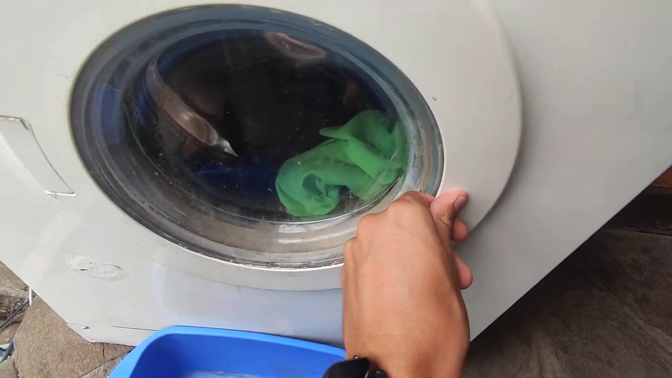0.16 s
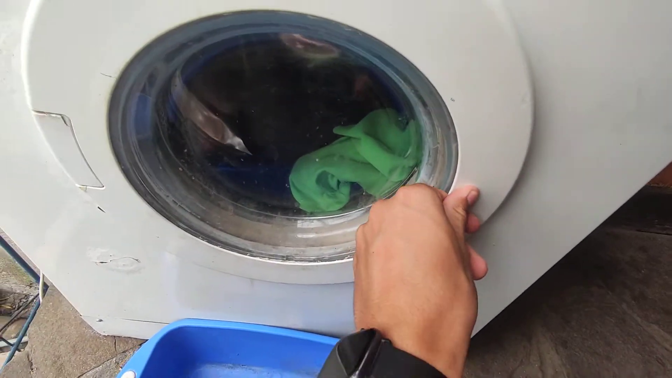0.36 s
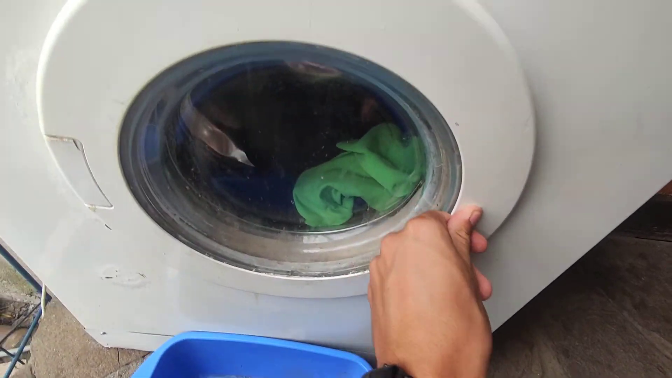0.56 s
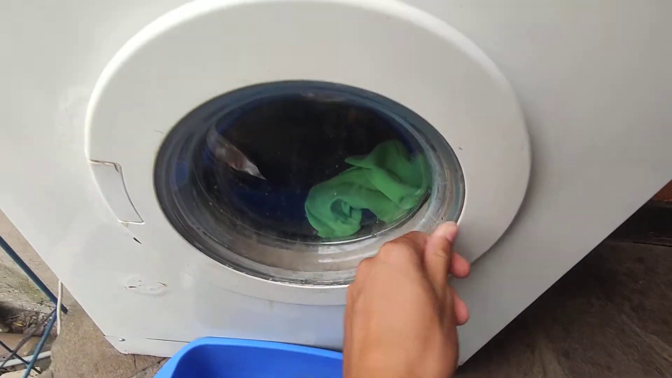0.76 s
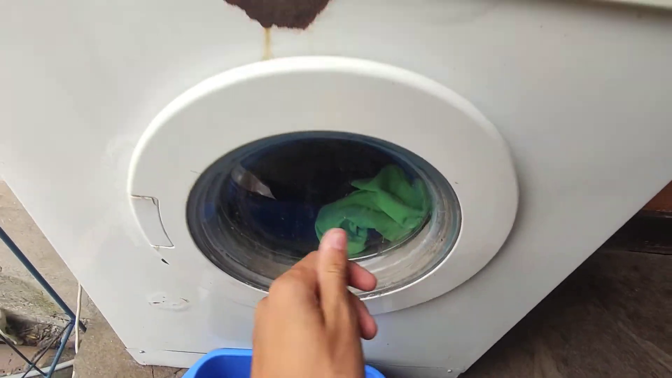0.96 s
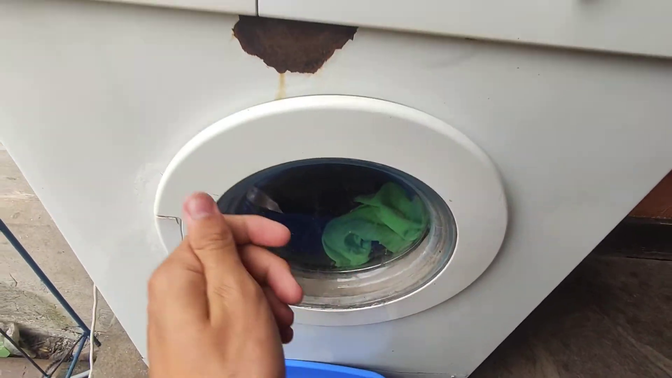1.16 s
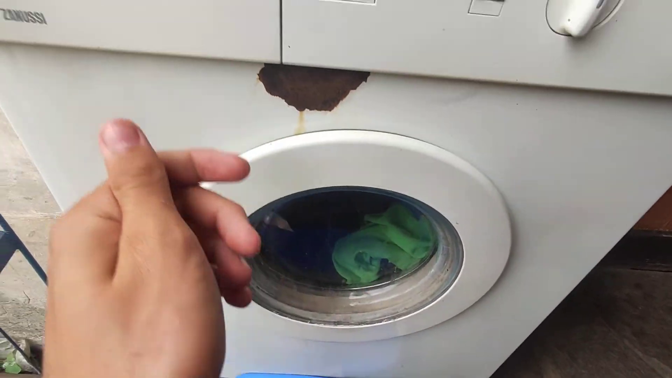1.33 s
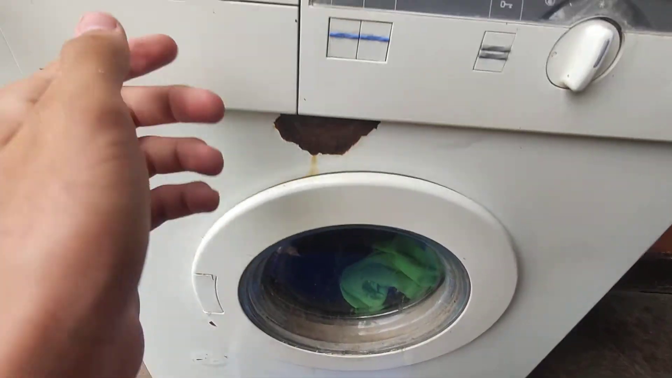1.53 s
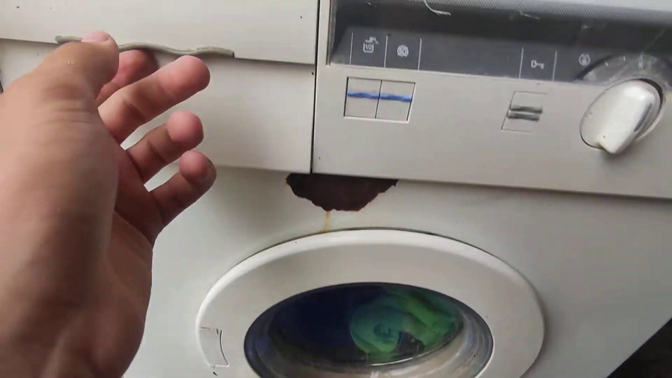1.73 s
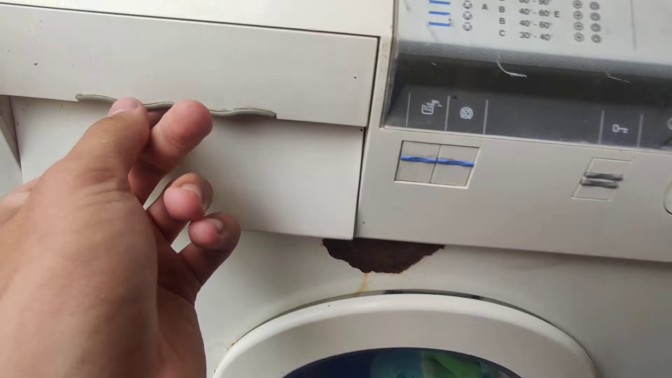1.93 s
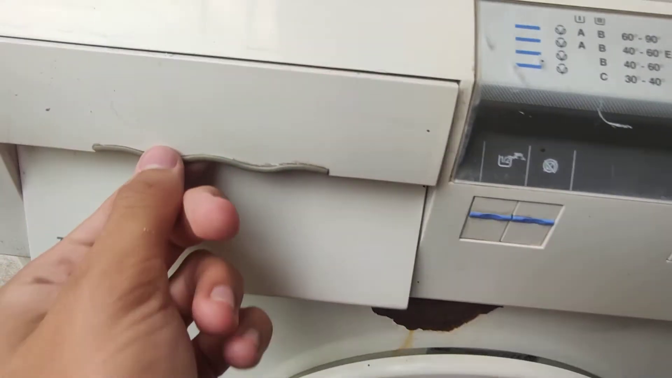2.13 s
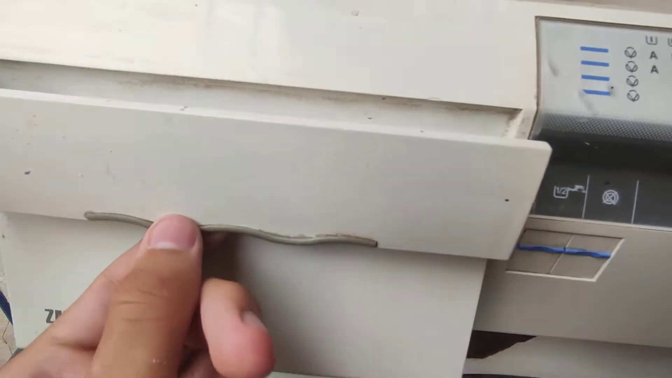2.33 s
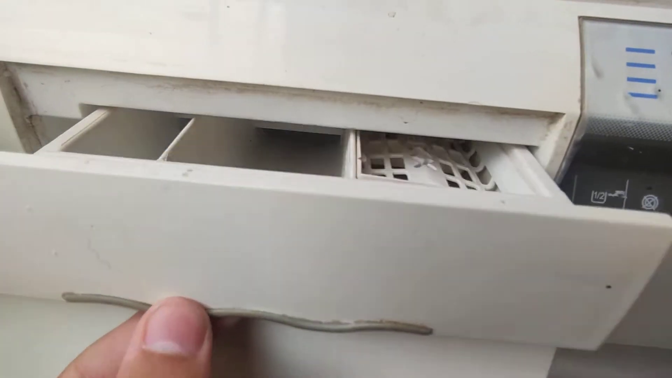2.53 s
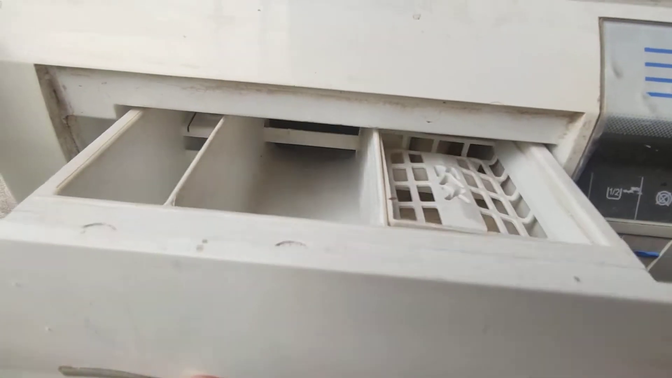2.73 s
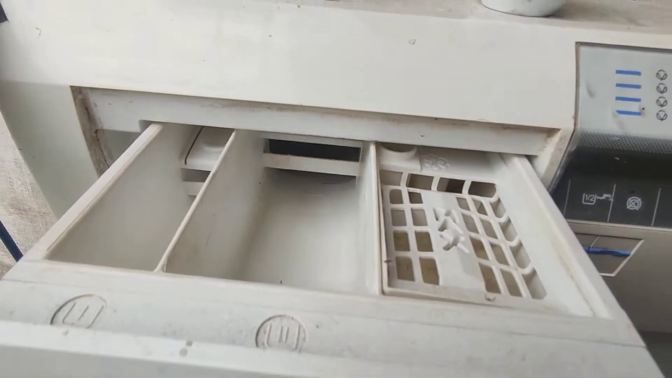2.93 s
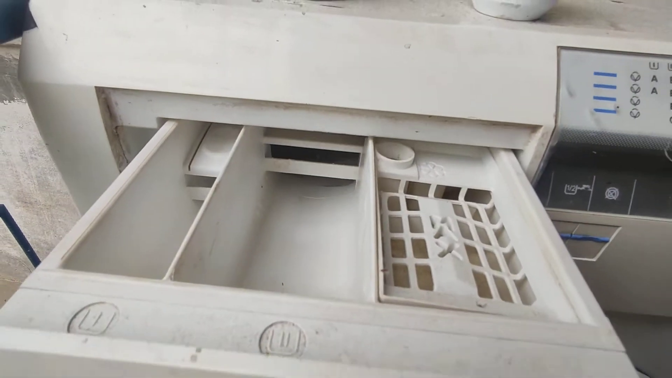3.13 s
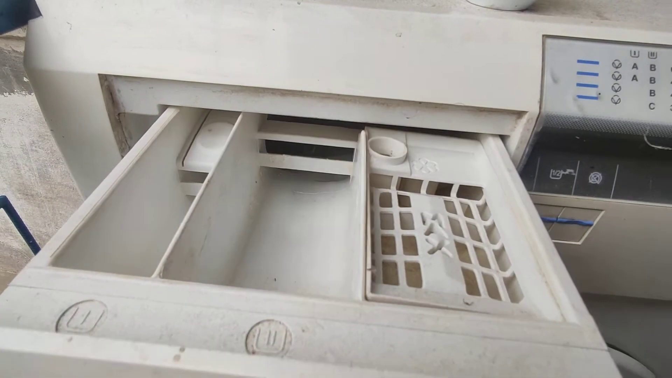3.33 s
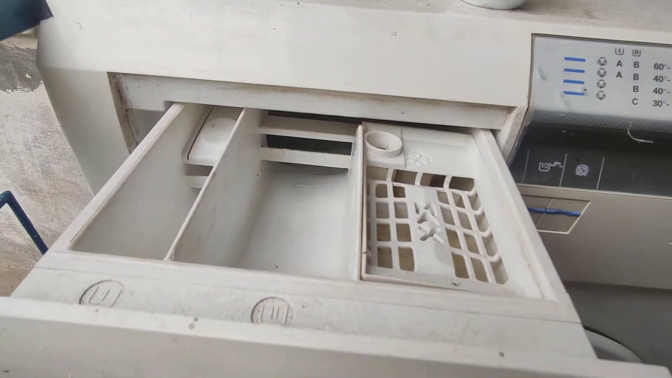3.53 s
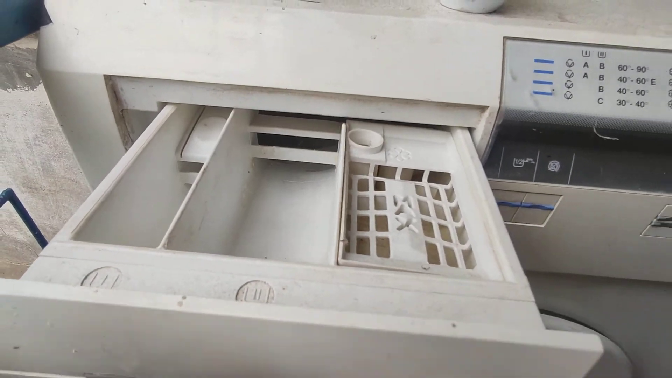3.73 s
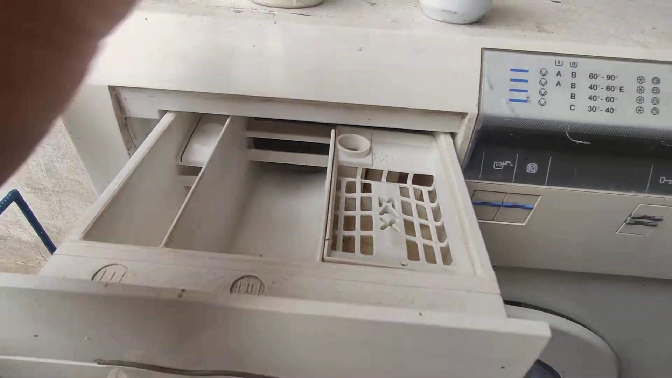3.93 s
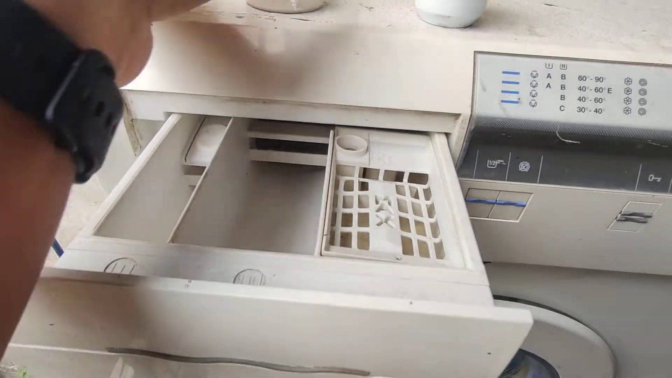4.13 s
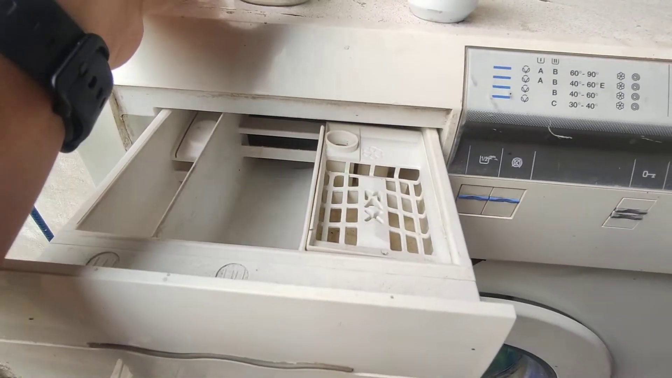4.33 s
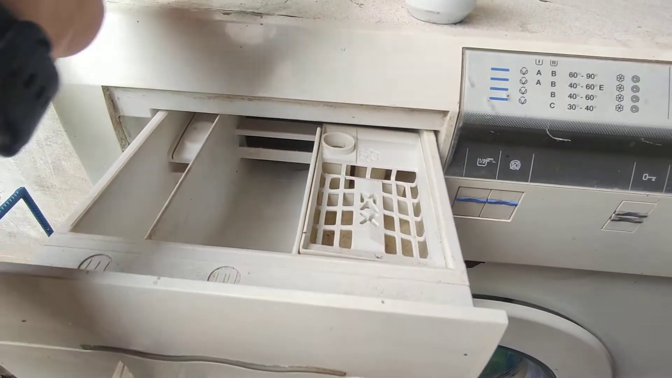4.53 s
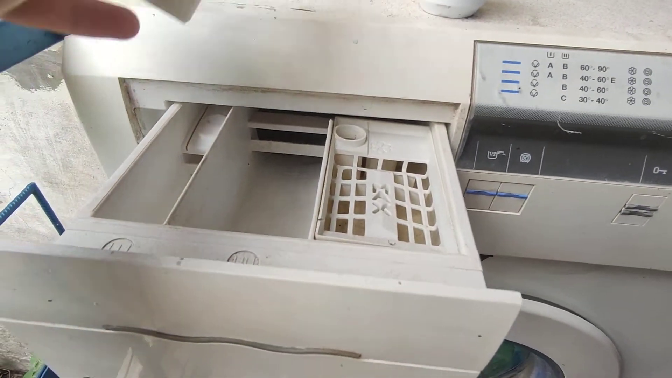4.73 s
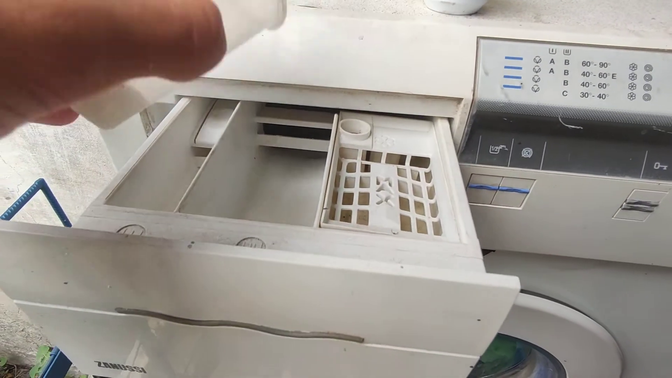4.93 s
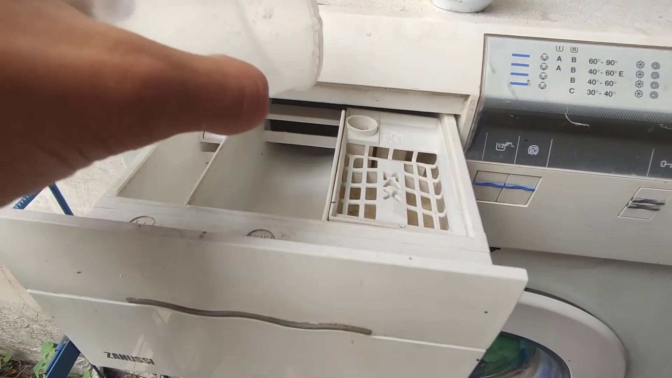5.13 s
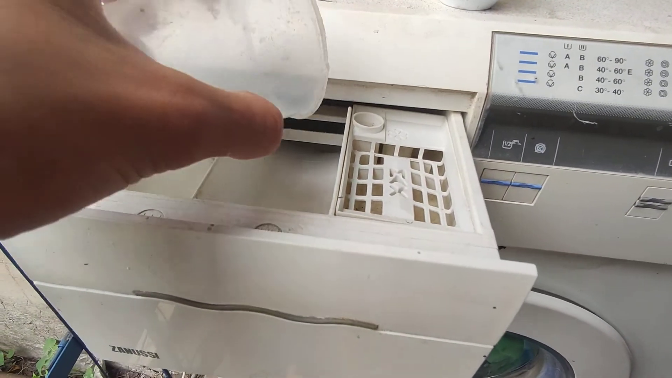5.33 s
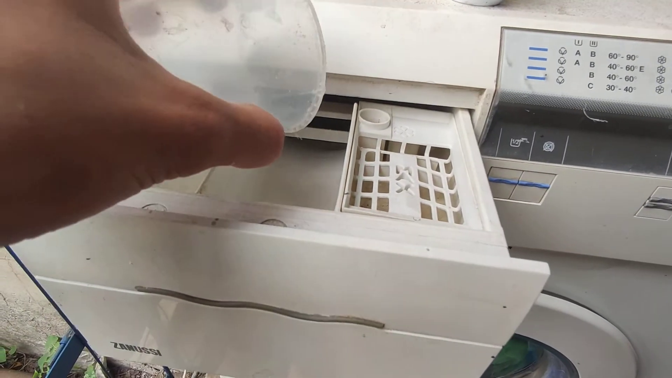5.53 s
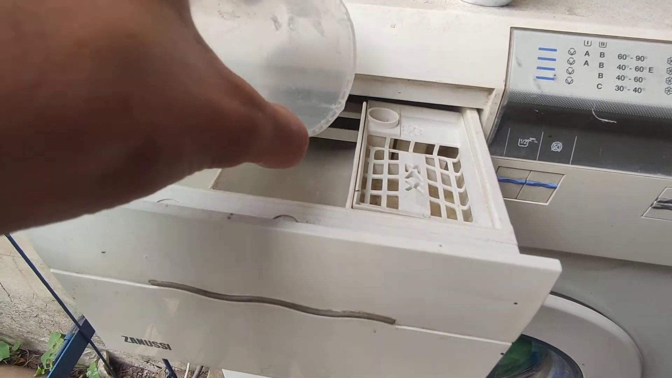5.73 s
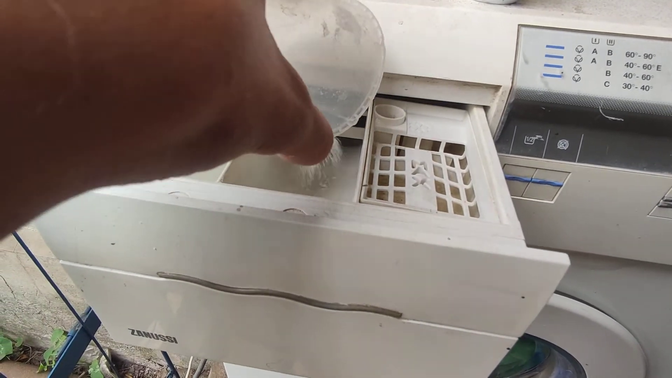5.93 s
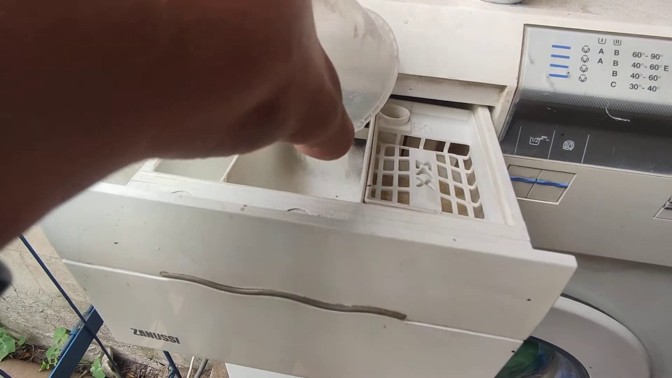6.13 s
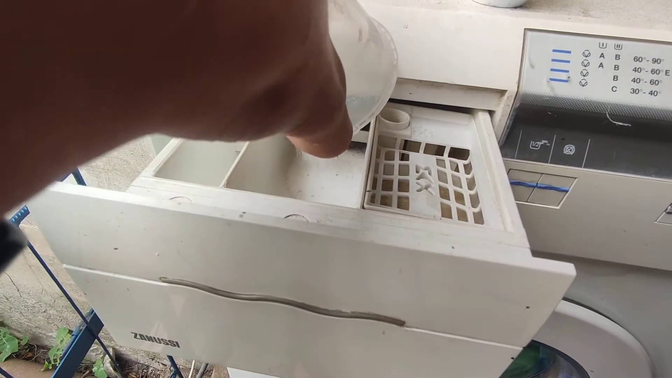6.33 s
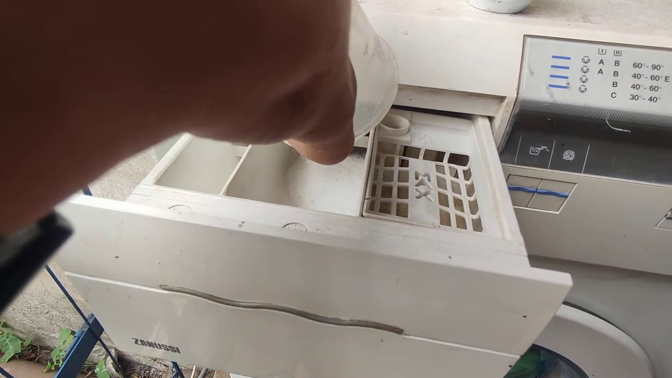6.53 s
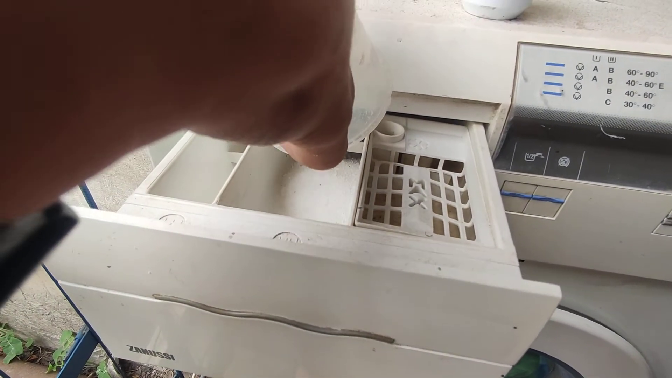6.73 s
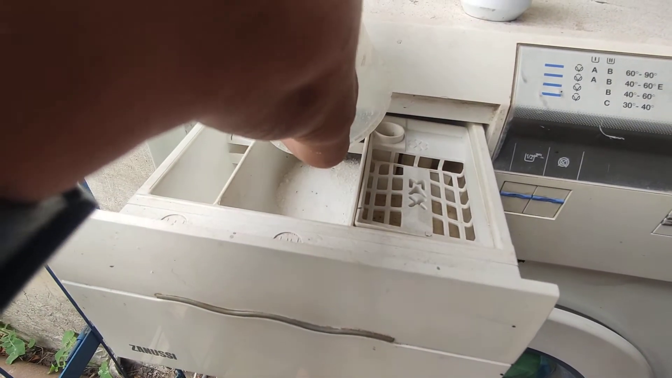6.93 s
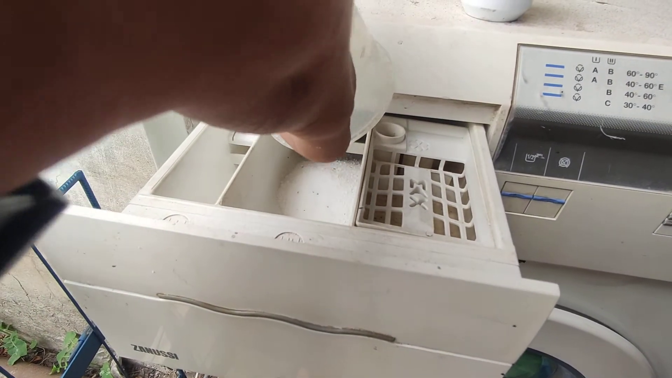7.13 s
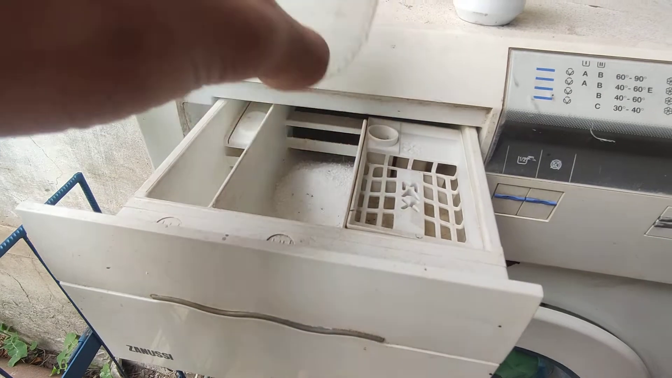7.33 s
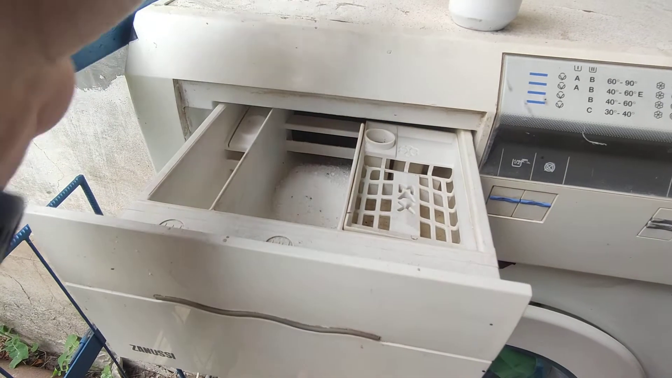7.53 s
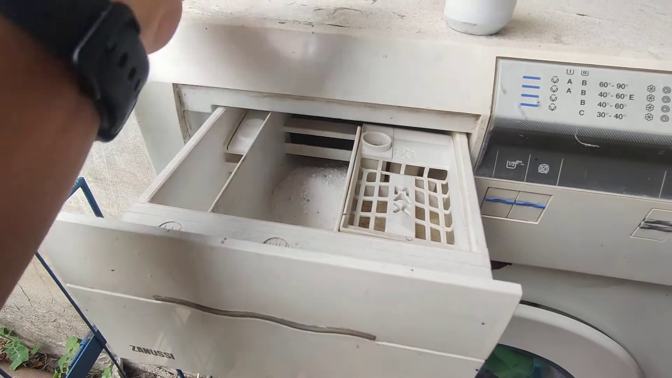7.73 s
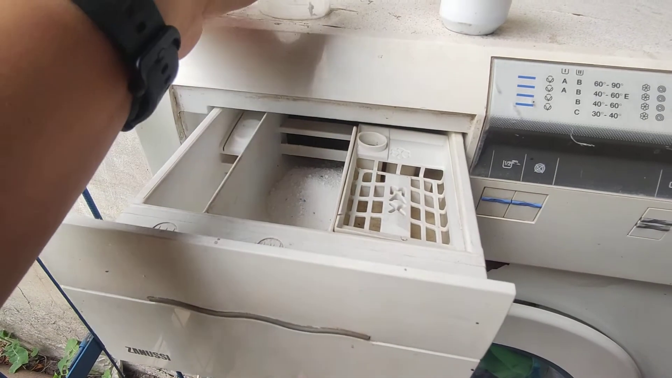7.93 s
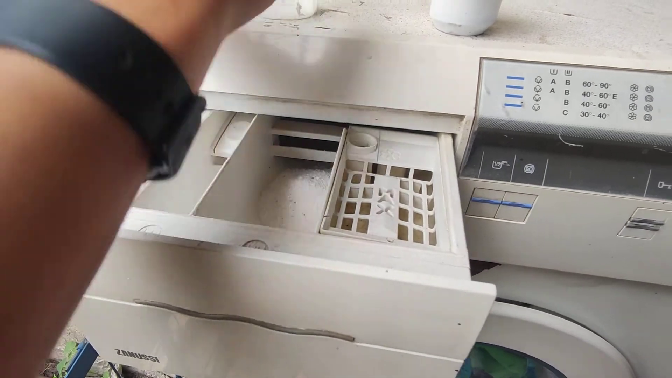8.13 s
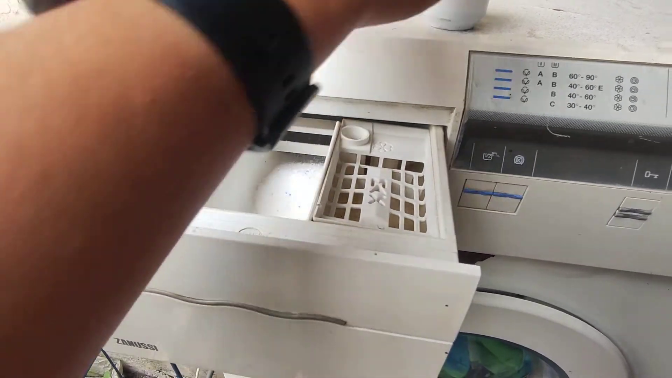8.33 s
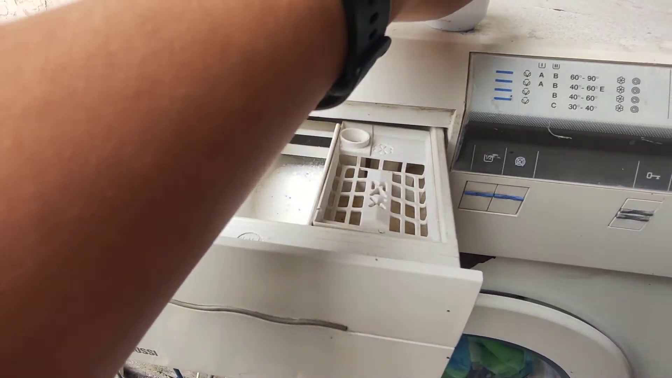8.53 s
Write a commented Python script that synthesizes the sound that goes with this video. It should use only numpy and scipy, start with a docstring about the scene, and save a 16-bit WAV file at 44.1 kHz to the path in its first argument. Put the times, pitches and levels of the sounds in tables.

```python
"""A front-loading washing machine on a sheltered porch, heard from arm's length.
Its door thumps against the rubber seal and latches. Fingers rub the plastic detergent drawer, which
judders out along its rails, hits its stop and drops. Powder hisses into the tray from a plastic cup,
which is then set down on the hollow lid. Each knock makes the panels ring and the porch echo.
Hand and sleeve brush the machine now and then; a low hum and far traffic lie underneath."""
import sys
import numpy as np
from scipy import signal
from scipy.io import wavfile

SR = 44100
rng = np.random.default_rng(int(sys.argv[2]) if len(sys.argv) > 2 else 0)


def bounce(signal):
    """Save signal as a 16-bit WAV file at the path given by the first command-line argument."""
    frames = np.transpose(np.atleast_2d(signal))
    limited = np.clip(frames, -1, 1)
    pcm = np.round(limited * 32767).astype(np.int16)
    wavfile.write(sys.argv[1], SR, pcm)


N = 382347
TIME = np.arange(N) / SR
RING_TIME = TIME[:SR // 2]
BAND_EDGES = np.geomspace(35, 16500, 24)
FILTER_BANK = [(np.sqrt(low * high), signal.butter(2, [low, high], "band", fs=SR, output="sos"))
               for low, high in zip(BAND_EDGES, BAND_EDGES[1:])]

# Levels are relative: each layer applies its own gains. A mode is a tone that a part rings with.
# t60 is the time a sound takes to fade by 60 dB.
# how alike left and right are: f/Hz, correlation
LIKENESS = [(60, 1), (130, 0.89), (250, 0.95), (500, 0.45), (1000, 0.011), (4000, .03), (12000, 0.055)]
# fading of the panels' many short modes, and of the porch's echo: f/Hz, t60/s
PANEL_T60 = [(120, 0.15), (400, 0.19), (1200, 0.096), (4000, 0.17), (12000, 0.035)]
PORCH_T60 = [(120, 1), (400, 0.33), (1200, 0.29), (4000, 0.32), (12000, 0.2)]
# short echoes from the panels close by: delay/ms, level/dB
PANEL_ECHOES = [(1.3, -8), (2.3, -5), (3.7, -6)]
# tone colour of background air, brushing, sliding and falling powder: f/Hz, level/dB
AIR_COLOUR = [(18, -44), (30, -21.5), (55, -19), (123, 8), (152, -3), (173, -2), (292, -2), (379, -1),
              (420, 3), (606, -9), (787, -10.5), (1440, -19.5), (1590, -17), (3230, -29.5), (15500, -50.5)]
BRUSH_COLOUR = [(200, 22), (400, 22), (900, 22), (1400, 25.5), (2200, 15.5), (3200, 21.5), (4400, 17.5),
                (5500, 0), (8500, 3), (12000, -14), (15500, 0)]
SLIDE_COLOUR = [(59, -32), (100, -11), (192, -6.5), (228, 1.5), (319, 1), (530, -29), (825, -21.5),
                (1090, -29), (1400, -18), (2180, -33), (3250, -25), (5630, -23), (8410, -30), (11100, -36),
                (15500, -44.5)]
POWDER_COLOUR = [(300, -50), (1200, -5), (1800, 0), (2800, -10.5), (4500, -4.5), (8500, -2), (11000, -9.5),
                 (15500, -10)]
# tone colour of knocks from the door, drawer, dropping tray and cup: f/Hz, level/dB
DOOR_COLOUR = [(35, -57.5), (80, -7), (135, -3.5), (400, -5), (657, -21), (889, -15.5), (1230, -27.5),
               (1320, -7.5), (2010, -23.5), (2410, -19.5), (3580, -36.5), (5450, -25), (6410, -41),
               (9510, -23), (15500, -50)]
DRAWER_COLOUR = [(53, -39.5), (130, -17.5), (290, 3), (599, -32.5), (682, -1.5), (902, -7.5), (1140, -2.5),
                 (1300, -3.5), (1580, -2.5), (1800, -3.5), (3010, -18), (4540, -32), (4950, -37.5),
                 (8660, -45.5), (15500, -56)]
DROP_COLOUR = [(53, -36.5), (150, -8), (290, 1), (600, -11), (800, 0.5), (1100, 1), (1350, -11.5),
               (1700, -0.5), (2100, -4.5), (3200, -12), (4500, -22.5), (6000, -28.5), (8700, -26),
               (15500, -33.5)]
CUP_COLOUR = [(59, -54), (100, -4), (210, 8), (347, 3), (541, 4), (697, 3), (936, -33), (1310, 0),
              (1430, -51), (3460, -40), (4190, -9.5), (15500, -16)]
# tones of the hum: f/Hz, level/dB
HUM_TONES = [(60, -9), (119, -15), (290, -6), (430, -4.5)]
# rise and fall of the far traffic: t/s, level/dB
TRAFFIC_LEVEL = [(0.0, -50.5), (0.55, -54.5), (1.11, -52.5), (2.051, -54.5), (2.44, -49), (2.748, -58),
                 (3.137, -57), (5.479, -58.5), (6.62, -57.5), (8.67, -59.5)]
# hand and sleeve stroke the panels: t/s, rise/s, hold/s, rub/dB, hiss/dB
HAND_STROKES = [(0.015, 0.025, 0.004, -55.5, -55.5), (0.515, 0.0076, .005, -46.5, -55.5),
                (0.52, 0.06, 0.093, -52.5, -55.5), (0.8, 0.051, 0.23, -58, -62),
                (1.2, 0.18, 0.0082, -47, -52.5), (1.84, 0.065, 0.038, -52.5, -56),
                (2.091, 0.0009, 0.0026, -48, -51.5), (3.79, 0.086, 0.09, -56.5, -66.5),
                (4.24, .15, 0.0054, -55.5, -58.5), (4.48, 0.017, 0.011, -51.5, -56),
                (5.55, 0.018, 0.0041, -52.5, -57.5), (7.915, 0.02, 0.017, -43.5, -45.5),
                (8.06, 0.0085, 0.012, -55.5, -56.5)]
# pitch ranges of a knock's four parts, thud, knock, clack and tick: low/Hz, high/Hz
KNOCK_ZONES = [(60, 550), (550, 2000), (2000, 6000), (6000, 16000)]
# knocks of the door, handle, drawer, dropping tray and cup:
# t/s, thud/dB, knock/dB, clack/dB, tick/dB, left minus right/dB, ring length factor
DOOR_HITS = [(0.0882, -24, -27, -23.5, -39, -1, 0.22), (0.0915, -65, -60, -61, -31.5, 8, 0.2),
             (0.1215, -30.5, -47, -68, -63, 0, 0.53), (0.2515, -81, -70, -62, -76, 6, 0.5),
             (0.539, -43, -67, -50.5, -89, -1, 0.5), (0.634, -44.5, -73, -78, -64, -4, 0.59)]
HANDLE_HITS = [(1.731, -41, -58, -61, -60, -0.5, 0.8), (1.762, -47.5, -60, -58, -65.5, -4, 0.45),
               (1.8855, -44, -49.5, -64, -56, -3, 1), (2.1425, -62, -48.5, -55, -89, -6, 0.22)]
DRAWER_HITS = [(2.2275, -35, -46, -71, -57, -2, 0.59), (2.2578, -48, -40.5, -41.5, -52, -3, 0.4),
               (2.274, -48, -45, -61, -67, -2, 0.35), (2.287, -60, -39.5, -47, -69, -5, 0.37),
               (2.307, -62, -53, -56, -57, 0, 0.25), (2.334, -40, -52, -47, -66, -4, 0.35),
               (2.3418, -39.5, -42, -44, -54, -1, 0.35), (2.3675, -32.5, -51, -64, -77, -5, 0.58),
               (2.4288, -49, -64, -67, -75, -3, 0.35), (2.543, -40, -43, -49, -72, -6, 0.23),
               (2.553, -34, -43.5, -38.5, -74, -3, 0.2), (2.571, -57, -49, -60, -70, 1, 0.25),
               (2.7095, -67, -38.5, -46, -66, -4, 0.3), (2.774, -34.5, -64, -50, -58, -3, 0.26),
               (2.790, -54, -38.5, -47, -63, -5, 0.19), (3.3278, -16.5, -21, -38, -31, 1, 0.23),
               (3.3315, -34, -49, -27.5, -28, 2, 0.24), (3.342, -46, -50, -32, -47, 0, 0.4),
               (3.4116, -44, -36, -52, -56, -3, 0.3)]
DROP_HITS = [(3.608, -65, -48.5, -62, -62, -0.5, 0.75), (3.619, -43, -47, -58.5, -54, -11, 0.46),
             (3.6341, -26.5, -26, -30, -24, 0, 0.37), (3.6395, -35, -25, -36, -52, -1, 0.26),
             (3.652, -39, -27.5, -42.5, -36.5, 1, 1)]
CUP_HITS = [(4.404, -45.5, -75, -69, -91, 0.82, 0.61), (4.515, -47.5, -63, -69, -76, 0, 0.85),
            (5.7873, -66, -73, -67, -73, -1.2, 0.6), (6.511, -60, -59, -78, -73, 0.011, 0.48),
            (7.9102, -30.5, -36.5, -59.5, -63, 0.26, 0.41), (7.936, -60, -49, -62, -66, 0, 3.3),
            (8.074, -55, -75, -60, -87, 0, 3)]
# modes of the door, the hollow handle and the cup's knocks: f/Hz, level/dB, t60/s
DOOR_MODES = [(112, -6, .28), (130, -1, .3), (245, -2, .33), (301, 1, .33), (361, -2, .35), (430, -5, .3),
              (560, -18, .38), (781, -15, .31), (1040, -13, .15), (1190, -10, .16), (1320, -4, .12),
              (1400, -5, .12), (1480, -10, .16), (1618, -10, .15), (1820, -11, .14), (2316, -10, .1),
              (2476, -12, .17), (3075, -17, .12), (4226, -19, .15), (4500, -19, .15)]
HANDLE_MODES = [(435, -8, .3), (760, 2, .06), (1012, 5.5, .17), (1150, 0, .08)]
CUP_MODES = [(319, -1, .15), (360, 3, .09), (417, -6, .12), (680, 1, .07), (765, -3, .08), (1120, -14, .1),
             (1255, -7, .065), (1420, -7, .05), (1730, -5, .035)]
# the seal takes the door, rebounds and gives as the hand lets go: t/s, f/Hz, level/dB, half length/s
SEAL_THUMPS = [(0.0854, 133, -13.5, 0.0089), (0.165, 115, -29, 0.024), (0.249, 121, -36.5, 0.027),
               (0.545, 149, -37.5, 0.022), (0.638, 131, -30.5, 0.0064), (0.676, 128, -33, 0.0076)]
# fingers rub the drawer front, lightly and then pressing: t/s, rise/s, hold/s, rasp/dB, hiss/dB
FINGER_RUBS = [(1.558, 0.028, 0.026, -46, -41), (1.612, 0.032, 0.036, -38.5, -43.5)]
# resonances of the drawer front and of the tray's thin walls: f/Hz, width/Hz, level/dB
DRAWER_FRONT = [(1750, 120, 6), (2050, 45, 6), (2300, 45, 3), (2600, 40, 4), (2900, 50, 3), (3200, 50, 3),
                (3480, 50, 6), (4390, 130, 4), (4800, 45, 4), (5820, 40, 0), (8050, 40, 0)]
TRAY_WALLS = [(2320, 70, 2), (2890, 65, 3), (3380, 50, 0), (3950, 130, 1), (4380, 70, 0), (4680, 130, 2),
              (5300, 60, 3), (6400, 110, 1)]
# modes of the tray when jerked lengthwise and when dropped: f/Hz, jerked/dB, dropped/dB, t60/s
TRAY_MODES = [(122, -14, -17, .2), (240, -4, -6, .34), (303, -1, -5, .19), (365, -2, -5, .16),
              (465, 2, -2, .06), (690, 0, -6, .05), (830, -6, -10, .15), (1017, -10, 0, .18),
              (1150, 0, -5, .24), (1305, -1, -12, .13), (1600, -8, 0, .17), (2067, -10, -3, .16),
              (2316, -6, -9, .15), (2705, -17, -13, .17), (2900, -10, -12, .15), (3050, -10, -6, .14),
              (3380, -14, -13, .11), (3850, -17, -15, .13), (4460, -14, -10, .07)]
# the tray sticks on its catch, drags off its seat, and rubs before its stop and its drop:
# t/s, rise/s, hold/s, rumble/dB, scrape/dB, hiss/dB
TRAY_DRAGS = [(2.17, .13, 0.056, -45.5, -45.5, -58), (2.34, 0.015, 0.054, -41.5, -75, -82),
              (3.275, 0.051, 0.003, -43, -39.5, -46.5), (3.594, 0.011, 0.025, -65.5, -55, -55.5)]
# speed of the freely sliding drawer, given as a loudness: t/s, level/dB
PULL_SPEED = [(2.39, -67), (2.598, -56.5), (2.662, -60), (2.85, -57.5), (3.09, -60.5), (3.16, -73),
              (3.22, -99)]
# squeaks of the rails: t/s, f/Hz, level/dB, half length/s
RAIL_SQUEAKS = [(2.303, 1600, -24, 0.0021), (2.3103, 1596, -23.5, 0.01), (2.839, 1490, -33.5, 0.005)]
# powder flow, one list each for a first trickle, the main pour and a last shake: t/s, level/dB
POWDER_FLOW = [
    [(5.15, -70), (5.218, -64), (5.226, -64), (5.45, -69), (5.52, -90)],
    [(5.82, -71), (5.91, -59.5), (5.985, -58), (6.02, -51), (6.055, -51), (6.085, -57), (6.25, -58.5),
     (6.498, -67.5), (6.51, -69)],
    [(6.56, -66), (6.624, -55.5), (6.678, -57), (6.778, -84), (6.78, -78)],
]
# lumps of powder tick on the plastic: t/s, level/dB, f/Hz
POWDER_LUMPS = [(5.1102, -56.5, 6600), (5.1375, -53, 6600), (5.2297, -58, 6450), (5.7868, -46, 4820),
                (5.8684, -56, 4130), (6.012, -62, 3900), (6.038, -49.5, 3600), (6.056, -53, 4200),
                (6.843, -62.5, 9450)]
# peaks and dips in the treble of each side: f/Hz, width/Hz, left/dB, right/dB
TREBLE_SHAPE = [(2780, 7800, 1, -1), (4760, 330, -5.5, 3), (4950, 130, -7.5, -7.5),
                (5590, 170, -16.5, -11.5), (6610, 110, 3, 8.5), (6990, 378, -18, -5), (7950, 980, -17, 2.5),
                (8400, 560, -8.5, 7), (11040, 660, -2, -6.5), (12160, 410, 6, 4.5)]

QUICK_FADE_DB_PER_S = 461.5
CUTOFF_HZ = 15800


def amp(db):
    """Turn decibels into a gain."""
    return np.exp(np.log(10) / 20 * np.asarray(db))


def at_hz(points, hz):
    """Read a table at a frequency, on a log-frequency axis."""
    points = np.array(points)
    return np.interp(np.log(hz), np.log(points[:, 0]), points[:, 1])


def gain_curve(rows):
    """Join (time, level) points into a gain that fades out beyond both ends."""
    s, db = np.transpose(rows)
    inside = np.clip(1 + np.minimum(TIME - s[0], s[-1] - TIME) / 0.055, 0, 1)
    return inside * amp(np.interp(TIME, s, db))


def unit(x, count=N):
    """Scale a stereo sound so that its middle has rms 1 over the first count samples."""
    return x / np.sqrt(np.mean(x.mean(0)[:count] ** 2) + 1e-20)


def band(x, low_hz, high_hz, order=2):
    """Keep the sound between two frequencies."""
    sos = signal.butter(order, [low_hz, min(high_hz, .45 * SR)], "band", fs=SR, output="sos")
    return signal.sosfilt(sos, x)


def ring(x, hz, width_hz):
    """A resonance: let through only the sound near one pitch."""
    return signal.lfilter(*signal.iirpeak(hz, hz / width_hz, fs=SR), x)


def drift(per_s):
    """A random curve, about 1 in size, that turns per_s times a second."""
    knots = rng.standard_normal(N // 20)
    return np.interp(TIME * per_s, np.arange(len(knots)), knots)


def pair(two, hz):
    """Mix two unrelated signals into left and right, alike in the bass."""
    alike = at_hz(LIKENESS, hz)
    return np.sqrt(1 + alike) * two[0] + np.sqrt(1 - alike) * two[1] * [[1], [-1]]


def pan(x, left_db):
    """Lean a sound to the left or right."""
    return x * amp([[left_db / 2], [-left_db / 2]])


def add(out, s, sound):
    """Mix a sound in at s seconds."""
    start = round(s * SR)
    out[:, start:start + sound.shape[-1]] += sound[..., :N - start]


def grains(per_s, spread_db):
    """Four streams of tiny random impacts of uneven size."""
    happens = rng.random((2, 2, N)) < per_s / SR
    impacts = happens * rng.standard_normal((2, 2, N))
    return impacts * amp(spread_db * np.minimum(rng.exponential(1, N), 4)) + 1e-18


def coloured(streams, colour):
    """Give noise a tone colour band by band; neighbouring bands take different streams."""
    return sum(amp(at_hz(colour, hz)) * pair(signal.sosfilt(sos, streams[k % 2]), hz)
               for k, (hz, sos) in enumerate(FILTER_BANK))


def bump(s, half_length_s):
    """A bell-shaped gain that peaks at s seconds."""
    return np.exp(-np.minimum(((TIME - s) / half_length_s) ** 2, 20))


def swell(s, rise_s, hold_s, fade_db_per_s):
    """Gain of one movement: it builds up, holds and dies away."""
    rise = np.clip((TIME - s) / max(rise_s, .001), 0, 1)
    fade_db = fade_db_per_s * np.maximum(TIME - s - rise_s - hold_s, 0)
    return rise * amp(-np.minimum(fade_db, 200))


def movements(rows, fade_db_per_s):
    """One gain curve for each level column in a table of rubbing movements."""
    power = sum((amp(levels_db)[:, None] * swell(s, rise_s, hold_s, fade_db_per_s)) ** 2
                for s, rise_s, hold_s, *levels_db in rows)
    return np.sqrt(power)


def read_at(x, times):
    """Read both sides of a sound at shifted times."""
    return np.array([np.interp(times, TIME, side) for side in x])


def panel_echoes(x, waver=.008, per_s=3):
    """Add short echoes from nearby panels; their paths waver as the hand moves."""
    out = x
    for delay_ms, db in PANEL_ECHOES:
        delay_s = delay_ms / 1000 * (1 + waver * drift(per_s))
        out = out + amp(db) * read_at(x, TIME - delay_s)
    return out


def wall_ringing(x, resonances, pitch_share=.02, waver_db=3.5, per_s=14):
    """A plastic wall's resonances shift in pitch and strength as the contact moves over it."""
    out = 0
    for hz, width_hz, db in resonances:
        shifted = TIME + pitch_share / per_s * drift(per_s)
        out = out + amp(db + waver_db * drift(per_s)) * read_at(ring(x, hz, width_hz), shifted)
    return out


def struck(colour, modes, length, modes_db, crack_db, porch_db):
    """One knock: a contact crack, a wash of short panel modes, the porch's echo and a few clear modes."""
    t, wash, tones = RING_TIME, 0, 0
    noise = rng.standard_normal((2, 2, len(t)))
    for k, (hz, sos) in enumerate(FILTER_BANK):
        panel = amp(-60 * t / (length * at_hz(PANEL_T60, hz))) * np.minimum(t / 0.00063, 1)
        porch = amp(porch_db - 60 * t / at_hz(PORCH_T60, hz)) * np.minimum(t / 0.0079, 1)
        force = pair(noise[k % 2], hz) * (panel + porch)
        force[:, 0] += amp(crack_db) * (-1) ** k
        wash = wash + amp(at_hz(colour, hz)) * signal.sosfilt(sos, force)
    for k, (hz, db, t60) in enumerate(modes):
        # short waves reach the two sides out of step
        skew = (-1) ** k * np.arccos(at_hz(LIKENESS, hz)) * np.array([[.5], [-.5]])
        fade = amp(db + rng.normal(0, 1) - 60 * t / t60)
        pitch_hz = hz * (1 + .003 * rng.normal())  # the parts sit differently at each knock
        tones = tones + (-1) ** k * fade * np.sin(2 * np.pi * pitch_hz * t + skew)
    tones = tones * np.minimum(t / 0.00038, 1)
    return unit(wash, count=900) + amp(modes_db) * unit(tones, count=900)


def knocks(hits, colour, modes, length, modes_db, crack_db, porch_db):
    """Where and how hard a part is struck sets its share of thud, knock, clack and tick."""
    out = np.zeros((2, N))
    for s, *levels_db, left_db, ringing in hits:
        sound = struck(colour, modes, length * max(ringing, .2), modes_db, crack_db, porch_db)
        # alternate signs keep neighbouring zones in step where they overlap
        zones = [(-1) ** k * amp(db) * unit(band(sound, *KNOCK_ZONES[k]), count=900)
                 for k, db in enumerate(levels_db)]
        add(out, s, pan(sum(zones), left_db))
    return out


def surroundings(hiss_db, waver_db):
    """A wavering hum, low rumble, far traffic, faint hiss and, later, a deep drone."""
    s, db = np.transpose(TRAFFIC_LEVEL)
    traffic_db = np.interp(TIME, s, db)
    air = coloured(rng.standard_normal((2, 2, N)), AIR_COLOUR)
    hum = sum(amp(db + waver_db * drift(3.7)) * np.sin(2 * np.pi * hz * TIME + 1.35 * drift(5.0))
              for hz, db in HUM_TONES)
    bass = amp(-55.5) * hum + amp(-50) * unit(band(air, 32.0, 150))
    rumble_db = -45.5 + 0.82 * (traffic_db - traffic_db.mean())  # follows most of the traffic's swing
    rumble = amp(rumble_db) * unit(band(air, 121.7, 451.6))
    traffic = amp(6 + traffic_db) * unit(band(air, 520.0, 1700))
    # the drone comes up at 5.5 s, holds, and swells from 8.04 s
    drone_gain = np.clip((TIME - 5.5) / 0.88, 0, 1) * amp(-61.5 + 16.5 * np.maximum(TIME - 8.04, 0))
    phase = 2 * np.pi * 60.0 * TIME + 0.95 * drift(16)
    drone = drone_gain * (np.sin(phase) + amp(3) * np.sin(2 * phase))
    return bass + drone + rumble + traffic + amp(hiss_db) * unit(band(air, 3500, 24000))


def brushing(fibres_per_s):
    """Skin and cloth scuff over the panels in small jerks."""
    scuffs = coloured(grains(fibres_per_s, spread_db=1.5), BRUSH_COLOUR)
    rub = panel_echoes(scuffs * amp(2.0 * drift(190)))
    rub_gain, hiss_gain = movements(HAND_STROKES, fade_db_per_s=190)
    return rub_gain * unit(band(rub, 250, 5000)) + hiss_gain * unit(band(rub, 4500, 16000))


def door(spring_s, spring_db, lead_in_db):
    """The rubber seal takes the door with a soft thump, the latch snaps and its spring pings."""
    out = knocks(DOOR_HITS, DOOR_COLOUR, DOOR_MODES,
                 length=1.0, modes_db=-9.5, crack_db=18.5, porch_db=-18.0)
    for s, hz, db, half_length_s in SEAL_THUMPS:
        out = out + amp(db) * bump(s, half_length_s) * np.sin(2 * np.pi * hz * (s - TIME))
    # a narrow band of noise stands for the spring's cluster of close modes
    spring = unit(band(rng.standard_normal((2, len(RING_TIME))), 12790, 12940), count=4000)
    add(out, spring_s, amp(spring_db - 60 * RING_TIME / 0.17) * spring)
    # a brief, faint rush of noise swells just before the door's thump
    lead_in_gain = swell(0.068, rise_s=.016, hold_s=.003, fade_db_per_s=QUICK_FADE_DB_PER_S)
    return out + amp(lead_in_db) * lead_in_gain * unit(band(rng.standard_normal((2, N)), 500, 2500))


def finger_rasp(direct_db, fade_db_per_s):
    """Fingers stick and slip on the drawer front and make it sing at a few pitches."""
    slips = pair(band(grains(3000, spread_db=1.5), 1300, 9000, order=1), hz=3000)
    rub = panel_echoes(amp(direct_db) * slips + wall_ringing(slips, DRAWER_FRONT))
    rasp_gain, hiss_gain = movements(FINGER_RUBS, fade_db_per_s)
    return rasp_gain * unit(band(rub, 1000, 4200)) + hiss_gain * unit(band(rub, 3100, 13000))


def drawer_knocks():
    """Fingers tap the handle; the drawer judders, hits its stop, then drops and bounces on its rails."""
    jerked_modes = [(hz, db, t60) for hz, db, _, t60 in TRAY_MODES]
    dropped_modes = [(hz, db, t60) for hz, _, db, t60 in TRAY_MODES]
    taps = knocks(HANDLE_HITS, DRAWER_COLOUR, HANDLE_MODES,
                  length=0.47, modes_db=9.0, crack_db=-1.0, porch_db=-1.0)
    jerks = knocks(DRAWER_HITS, DRAWER_COLOUR, jerked_modes,
                   length=1.0, modes_db=-5.5, crack_db=13.5, porch_db=-16.5)
    drop = knocks(DROP_HITS, DROP_COLOUR, dropped_modes,
                  length=0.66, modes_db=-4.0, crack_db=9.5, porch_db=-20.5)
    return taps + jerks + drop


def drawer_slide(slips_per_s, modes_db):
    """Tiny slips on the rails, and coarser catches on dried powder, set the tray ringing."""
    catches = amp(14) * grains(55, spread_db=1.0)
    slips = grains(slips_per_s, spread_db=2.0)
    friction = coloured(slips + catches, SLIDE_COLOUR)
    tray = sum(ring(friction, hz, 1.9 / t60) for hz, *_, t60 in TRAY_MODES)
    rub = panel_echoes(friction + amp(modes_db) * tray + wall_ringing(friction, TRAY_WALLS))
    rub = rub * amp(2.2 * drift(160) + 1.4 * drift(30))  # the level flickers
    speed = gain_curve(PULL_SPEED)
    drag_rumble, drag_scrape, drag_hiss = movements(TRAY_DRAGS, QUICK_FADE_DB_PER_S)
    # the rumble dies away as less of the tray rests on the rails
    rumble_db = 18 - 10 * np.maximum(TIME - PULL_SPEED[0][0], 0)
    rumble = np.hypot(amp(rumble_db) * speed, drag_rumble) * unit(band(rub, 69, 680))
    scrape = np.hypot(amp(12) * speed, drag_scrape) * unit(band(rub, 770, 2700))
    hiss = np.hypot(amp(1.5) * speed, drag_hiss) * unit(band(rub, 6500, 17000))
    return pan(rumble + scrape + hiss, left_db=-2.1)


def rail_squeak(s, hz, db, half_length_s):
    """The rail sticks and slips at one pitch for a moment."""
    phase = 2 * np.pi * np.cumsum(hz * (1 + 0.09 * drift(420))) / SR
    tone = np.sin(phase) + amp(-32) * np.sin(2 * phase)
    return pan(amp(db) * bump(s, half_length_s) * tone, left_db=-6.5)


def cup():
    """The cup is picked off the hollow lid, touches the tray and is put back."""
    return knocks(CUP_HITS, CUP_COLOUR, CUP_MODES,
                  length=0.32, modes_db=5.0, crack_db=-27.0, porch_db=-13.0)


def powder(lump_t60, flow_db, snap_db, hollow_db):
    """Fine grains fall in small clumps and hiss into the tray; a few lumps tick on the plastic."""
    impacts = grains(1000, spread_db=3.6)
    fall = coloured(impacts, POWDER_COLOUR) * amp(1.6 * drift(140))
    fall = panel_echoes(fall + wall_ringing(fall, TRAY_WALLS))
    out = amp(flow_db) * sum(gain_curve(tip) for tip in POWDER_FLOW) * unit(fall)
    # the air in the compartment rings while the cup is held low over it
    hollow = ring(band(pair(impacts[0], hz=745), 500, 1000), hz=745, width_hz=160)
    out = out + amp(hollow_db) * swell(6.12, rise_s=0.2, hold_s=0.1, fade_db_per_s=16.5) * unit(hollow)
    lump_fade = amp(-60 * RING_TIME / lump_t60) + amp(-15 - 220 * RING_TIME)  # quick drop, softer tail
    for s, db, hz in POWDER_LUMPS:
        burst = rng.standard_normal((2, len(RING_TIME))) * lump_fade
        tick = unit(band(burst, hz / 1.23, hz * 1.21), count=130)
        snap = amp(snap_db) * unit(band(burst, 1600, 11400), count=130)
        add(out, s, amp(db - 4.5) * (tick + snap))
    return pan(out, left_db=-2.5)


def scene():
    """Mix the door, drawer, hands, powder and cup over the surroundings."""
    shut = door(spring_s=0.2415, spring_db=-43.0, lead_in_db=-33.5)
    drawer = drawer_knocks() + drawer_slide(slips_per_s=3600, modes_db=-2.0)
    squeaks = sum(rail_squeak(*row) for row in RAIL_SQUEAKS)
    hands = brushing(fibres_per_s=4500) + finger_rasp(direct_db=-7.5, fade_db_per_s=397)
    pouring = powder(lump_t60=0.023, flow_db=-1.0, snap_db=1.0, hollow_db=-58.0) + cup()
    return shut + drawer + squeaks + hands + pouring + surroundings(hiss_db=-69.0, waver_db=4.0)


def record(dry):
    """Give each side its own peaks and dips, then cut the very highest treble."""
    for hz, width_hz, *sides_db in TREBLE_SHAPE:
        dry = dry + (amp(sides_db)[:, None] - 1) * ring(dry, hz, width_hz)
    return signal.sosfilt(signal.ellip(10, .2, 90, CUTOFF_HZ, fs=SR, output="sos"), dry)


dry = scene()
out = record(dry)
bounce(out)
```